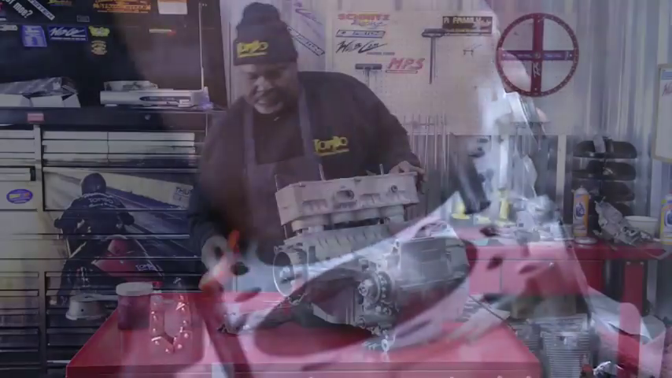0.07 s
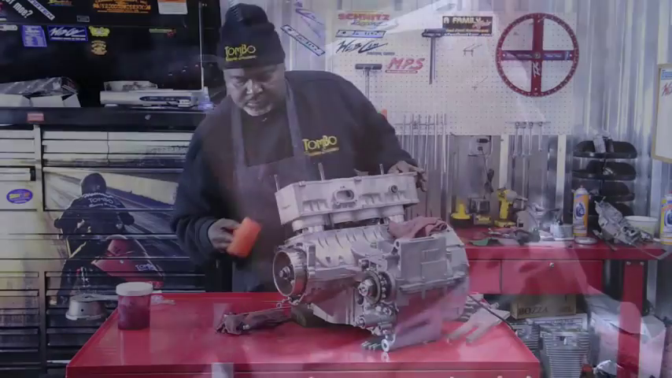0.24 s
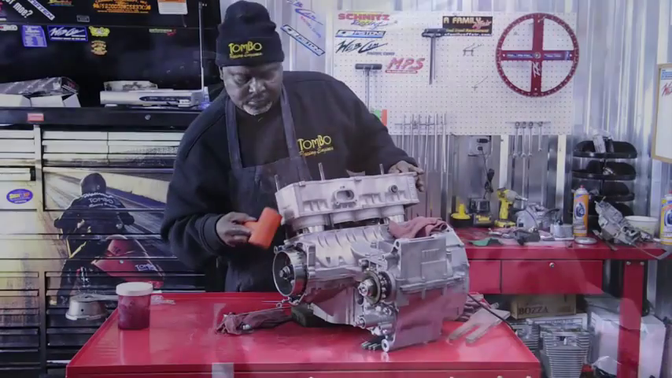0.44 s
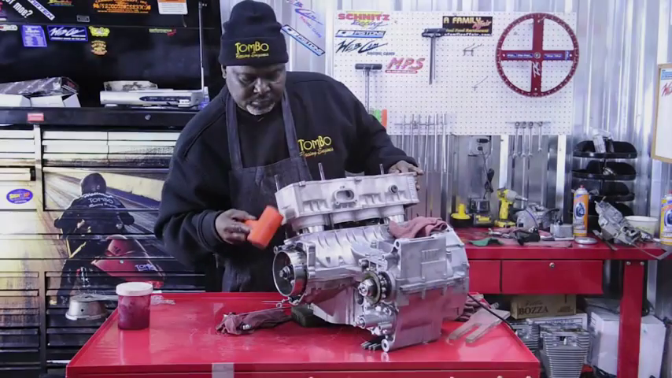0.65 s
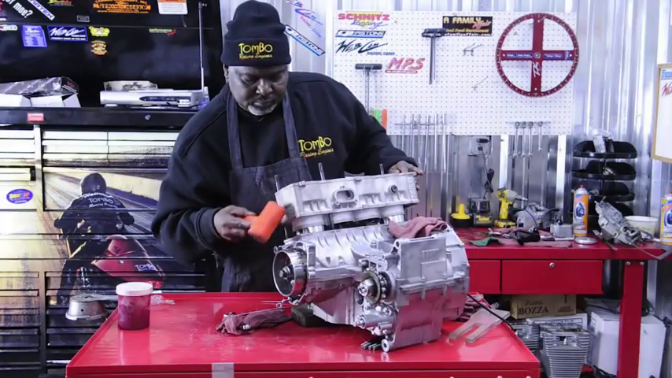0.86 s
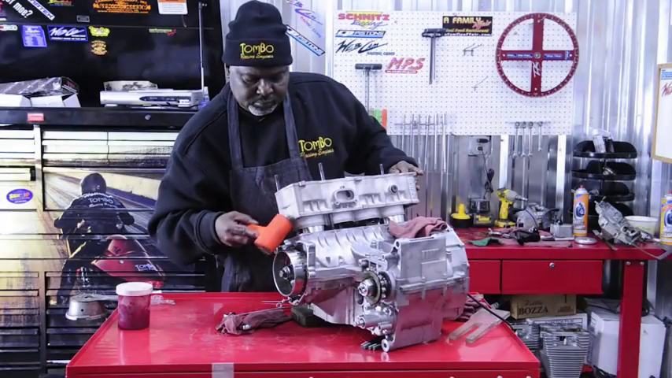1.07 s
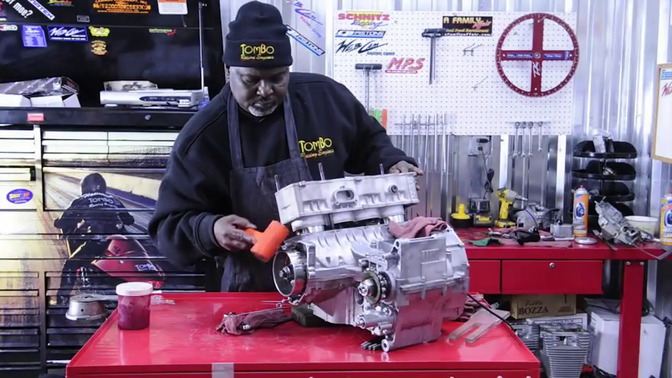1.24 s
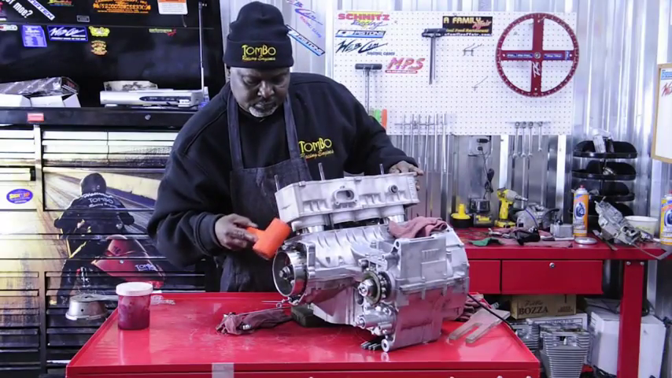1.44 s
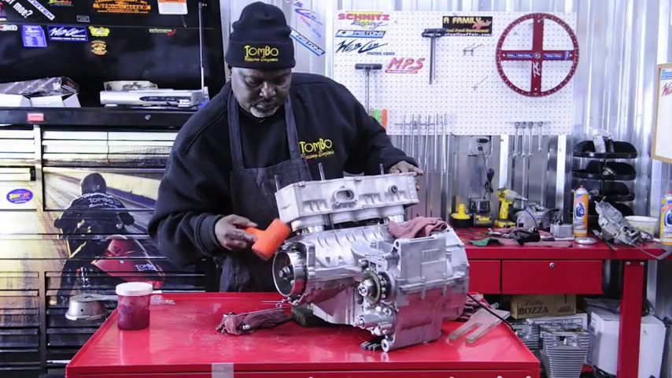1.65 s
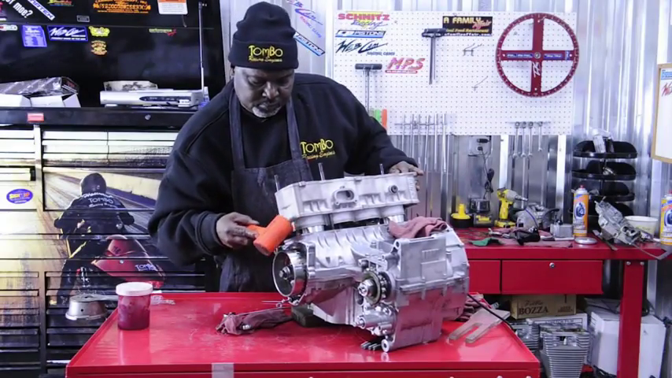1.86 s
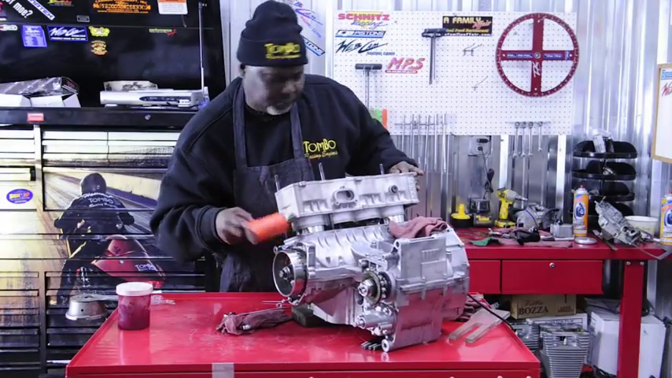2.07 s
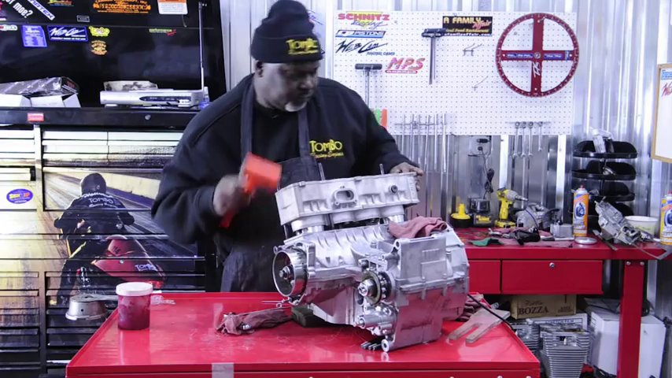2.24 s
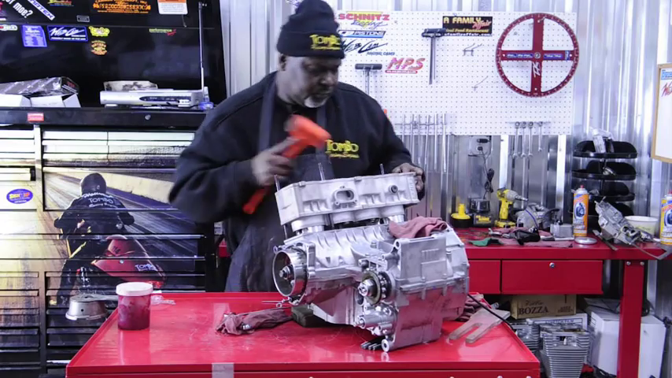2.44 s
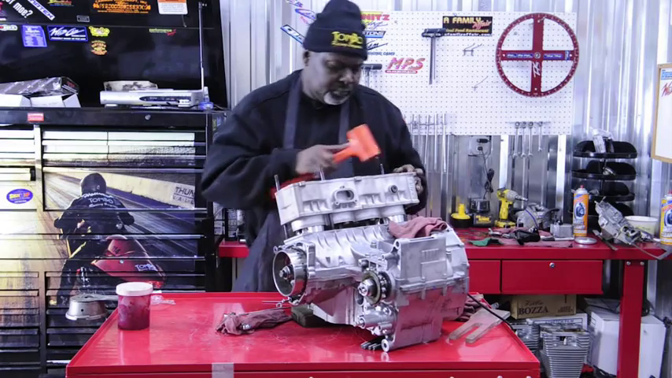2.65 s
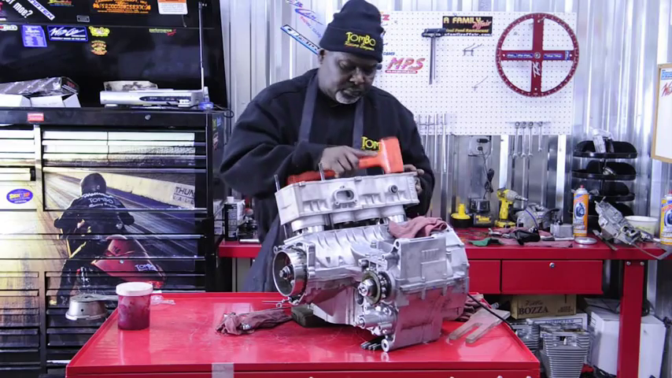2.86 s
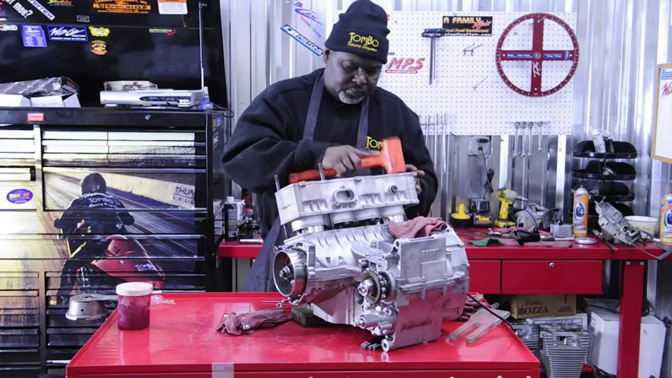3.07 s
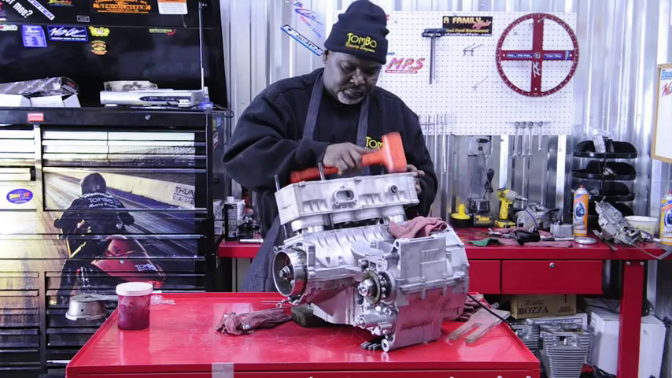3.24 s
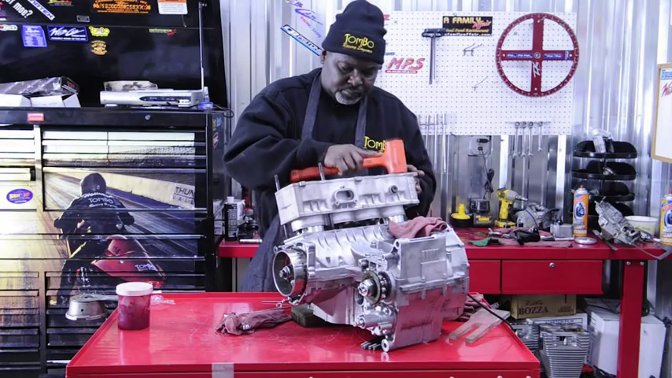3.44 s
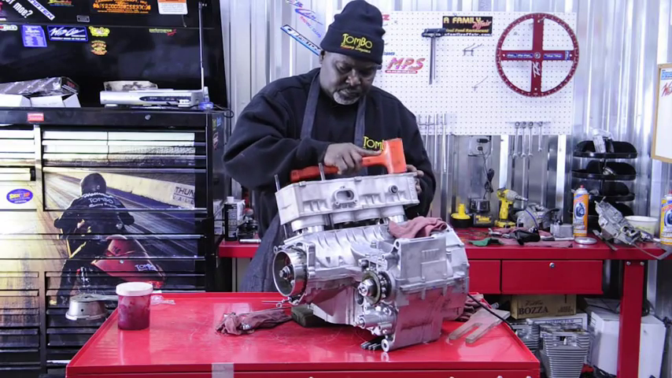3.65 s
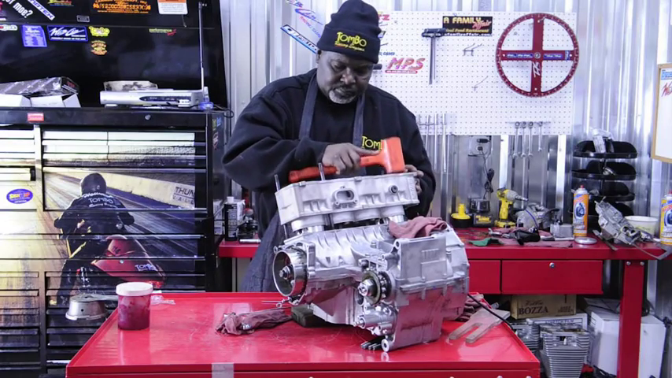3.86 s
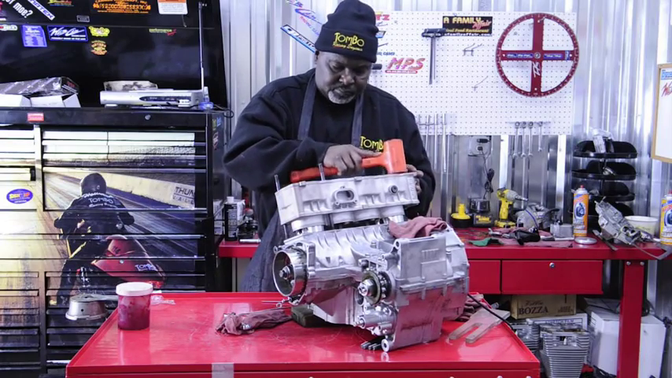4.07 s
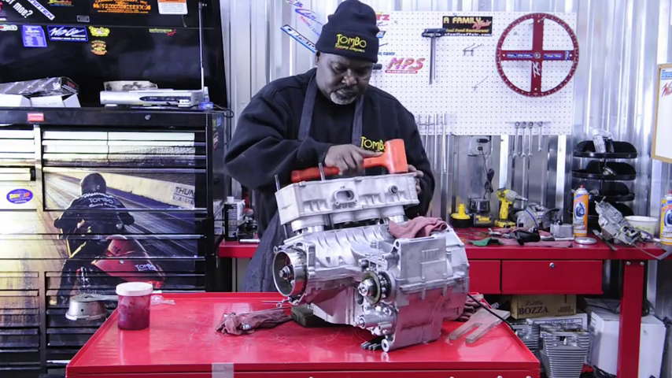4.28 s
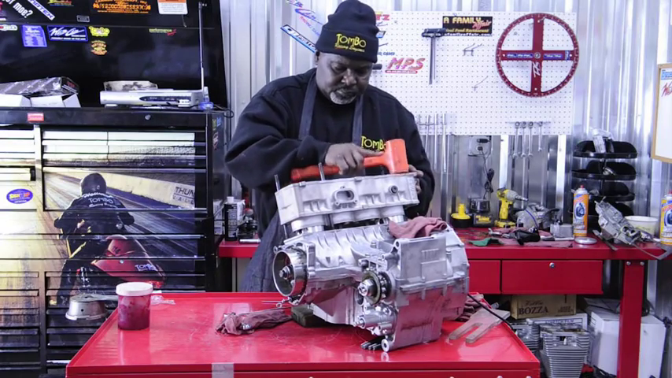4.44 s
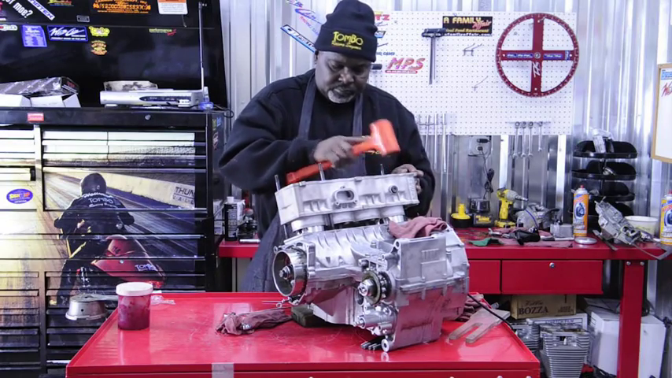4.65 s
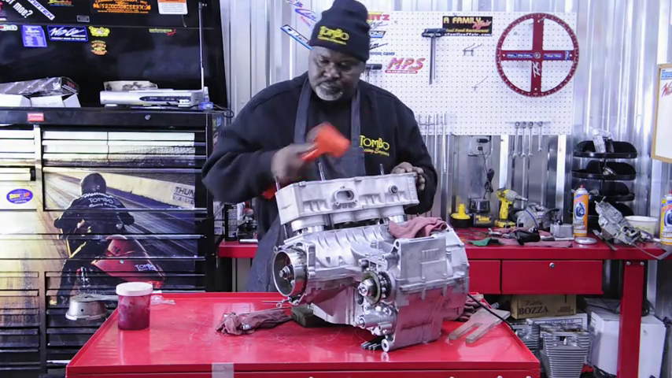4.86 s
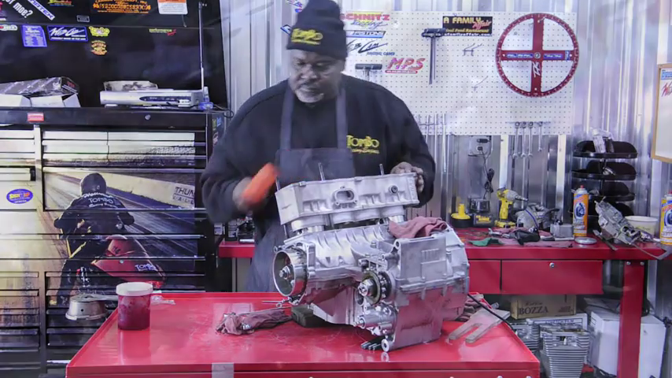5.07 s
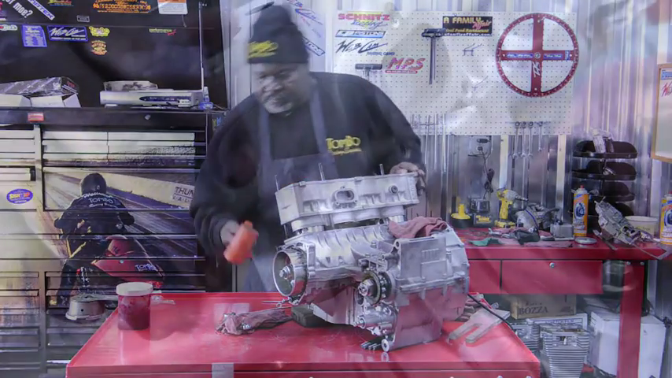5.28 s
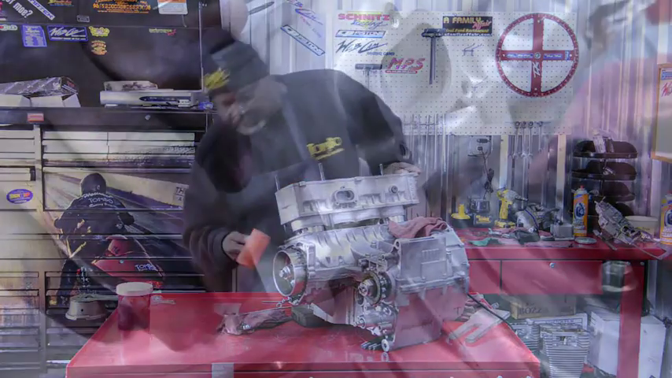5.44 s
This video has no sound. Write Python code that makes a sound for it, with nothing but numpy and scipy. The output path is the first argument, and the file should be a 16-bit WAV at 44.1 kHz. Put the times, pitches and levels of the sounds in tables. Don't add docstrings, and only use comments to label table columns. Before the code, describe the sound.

A low workshop rumble runs throughout, swelling around 1.5 and 3 seconds, with the hissy tail of an earlier clatter fading at the very start. Up to 1.3 s there are faint scrapes, light metallic touches and dull bumps, clearest near 0.8 s. From 1.4 to 2.0 s the shot-filled mallet taps the fins: short, bright double clacks at 1.37, 1.57, 1.80 and 1.98, strongest at 1.8. A softer tap at 2.3 and tiny pellet rattles near 2.5 follow. Loud hollow knocks on top of the block come at 2.94, 3.14, 3.33 and 3.51, each around 600 to 1000 Hz with a late shot rattle and bench thud. Sharp rattly clacks land at 3.67 and 3.87, then three more knocks at 4.13, 4.33 and 4.47, the last loudest. Faint ringing, small touches at 4.7 to 4.8 and a soft rustle finish. Short, diffuse room echo.

```python
import sys
import numpy as np
from scipy import signal
from scipy.fft import rfft, irfft, next_fast_len
from scipy.io import wavfile

SR = 44100
rng = np.random.default_rng(int(sys.argv[2]) if len(sys.argv) > 2 else 0)


def nominal_scale(level):
    x = np.asarray(level, float) / 20
    return 10 ** x


def generate_wav(sig):
    pcm = np.round(np.clip(np.atleast_2d(sig).T, -1, 1) * 32767).astype(np.int16)
    wavfile.write(sys.argv[1], SR, pcm)


N = 242991


def curve(points, hz):
    f, v = np.transpose(points)
    return np.interp(np.log(np.maximum(hz, 1)), np.log(f), v)


def colour(x, points):
    size = next_fast_len(len(x))
    gain = nominal_scale(curve(points, np.fft.rfftfreq(size, 1 / SR)))
    return irfft(rfft(x, size) * gain, size)[:len(x)]


def band(x, lo_hz, hi_hz):
    return signal.sosfilt(signal.butter(2, [lo_hz, hi_hz], "band", fs=SR, output="sos"), x)


def unit(x):
    return x / np.sqrt(np.mean(x ** 2))


def add(out, s, x):
    i = int(s * SR)
    out[i:i + len(x)] += x[:max(len(out) - i, 0)]


def ring(modes, force, length, scatter_db, shift=0.96, crowd=0.):
    t = np.arange(int(length * SR)) / SR
    neighbours = 6 if crowd else 1
    hz, db, t60 = np.repeat(np.transpose(modes)[:, :, None], neighbours, axis=1)
    chance = rng.standard_normal((3,) + hz.shape)
    sign = np.sign(chance[2]) if crowd else 1
    decay = np.exp(-np.log(1000) * t / t60)
    waves = decay * np.sin(2 * np.pi * shift * hz * (1 + crowd * chance[0]) * t)
    response = np.sum(sign * nominal_scale(db + scatter_db * chance[1]) * waves, axis=0)
    y = signal.fftconvolve(force, response)
    return y / np.abs(y).max()


def burst(ms):
    t = 1000 * np.arange(4096) / SR
    return rng.standard_normal(len(t)) * np.exp(-t / ms) * np.minimum(t / (0.27 * ms), 1)


def grains(rate):
    hit = rng.random(N) < rate / SR
    return unit(hit * rng.standard_normal(N) * nominal_scale(1.6 * rng.exponential(size=N)))


def swell(at, length):
    t = np.arange(N) / SR - at
    return np.where(t < 0, np.exp(-(t / (0.98 * length)) ** 2), np.exp(-np.abs(t) / length))


# frequency in Hz, density in dB per Hz.
SHOP_SPECTRUM = [(12, -23.5), (20, -8.5), (32, -6), (53, 1), (105, -0.5), (281, -15.5), (479, -18.5),
                 (521, -22), (913, -25.5), (2970, -37), (4160, -41.5), (13900, -45), (16500, -49)]
# time in seconds, level in dB.
RUMBLE_SWELL = [(0, -0.5), (.4, 0.5), (1.5, 6), (2.15, 1), (3.1, 5.5), (3.8, 0.5), (4.1, 1.5), (4.4, 3),
                (4.7, -0.5), (5.51, 0.5)]


def shop():
    t = np.arange(N) / SR
    rumble_db = np.interp(t, *np.transpose(RUMBLE_SWELL))
    clatter_db = 15.5 * np.exp(-t / 0.21)
    x = nominal_scale(-52.5) * unit(colour(rng.standard_normal(N), SHOP_SPECTRUM))
    low = signal.sosfiltfilt(signal.butter(2, 170, fs=SR, output="sos"), x)
    hiss = x - low
    return low * nominal_scale(rumble_db) + hiss * nominal_scale(0.91 * rumble_db + clatter_db)


# frequency in Hz, level in dB, t60 in seconds.
FIN_MODES = [(1250, -12, .015), (1690, -11, .015), (2100, -9, .015), (2540, -5, .018), (2900, -3, .018),
             (3250, 0, .02), (3700, -5, .015), (4200, -10, .012), (5000, -16, .01), (6000, -21, .008)]


def metal(ms):
    return ring(FIN_MODES, burst(ms), .12, 2, crowd=.06)


# time in seconds, level in dB.
SLIDE_LEVEL = [(0, -57), (.3, -73.5), (.72, -83), (.86, -56), (1.2, -75), (1.64, -63), (2.06, -65.5),
               (2.2, -70.5), (2.4, -59.5), (2.7, -80), (2.9, -72), (3.5, -66.5), (4.1, -69), (4.5, -65),
               (4.85, -71), (5.3, -79.5), (5.51, -63.5)]
# time in seconds, length in seconds, scrape in dB, fizz in dB.
SHOT_SPILLS = [(0.003, .025, -52.5, -61), (0.096, 0.019, -81, -54), (0.182, 0.011, -62.5, -60),
               (0.266, 0.0051, -60, -73), (0.357, 0.033, -50, -64), (0.774, 0.03, -41, -60),
               (1.003, 0.05, -70, -68), (1.307, 0.02, -56, -63), (1.405, 0.011, -68, -53),
               (1.539, .011, -46, -52), (1.762, 0.0076, -51, -56), (1.958, 0.014, -57.5, -64),
               (2.385, 0.039, -52.5, -73), (2.458, .008, -78, -61), (2.516, 0.036, -67.5, -61),
               (2.608, .031, -53.5, -60), (2.687, 0.02, -55, -77), (3.321, 0.0061, -70, -62),
               (3.504, 0.0055, -51, -48.5), (3.685, 0.0077, -67, -42), (3.765, .01, -50, -48.5),
               (3.919, 0.0098, -66, -51), (4.751, 0.013, -77, -55), (5.035, 0.026, -73, -66),
               (5.139, .025, -70, -72), (5.393, 0.11, -71.5, -71)]
# time in seconds, length in seconds, level in dB.
SHOT_RUBS = [(0.013, 0.043, -42.5), (0.12, 0.025, -45), (0.267, 0.011, -53), (0.355, 0.049, -48.5),
             (0.76, 0.013, -48), (1.012, 0.025, -55.5), (1.171, 0.029, -47), (1.395, 0.024, -39.5),
             (2.497, .028, -57), (2.604, 0.056, -54), (2.679, 0.012, -48.5), (3.76, 0.012, -54),
             (4.752, .008, -56), (5.408, 0.1, -57)]


def shot():
    t = np.arange(N) / SR
    scrape = unit(ring(FIN_MODES, grains(5000), .03, 1, crowd=.035)[:N])
    scrape = unit(scrape + 0.53 * unit(band(grains(4900), 800, 5500)))
    fizz = unit(band(grains(6000), 3400, 22000))
    rub = unit(band(grains(3000), 200, 1260))
    scrape_gain = nominal_scale(np.interp(t, *np.transpose(SLIDE_LEVEL)))
    fizz_gain = scrape_gain * nominal_scale(-47.5)
    for s, length, scrape_db, fizz_db in SHOT_SPILLS:
        spill = swell(s, length)
        scrape_gain = scrape_gain + nominal_scale(scrape_db) * spill
        fizz_gain = fizz_gain + nominal_scale(fizz_db) * spill
    rub_gain = sum(nominal_scale(db) * swell(s, length) for s, length, db in SHOT_RUBS)
    return scrape_gain * scrape + fizz_gain * fizz + rub_gain * rub


# frequency in Hz, t60 in seconds, level in dB.
ECHO_BANDS = [(100, 0.75, -18.5), (328, 0.44, -4), (600, 0.26, -21), (1040, 0.29, -8), (2930, 0.4, -15.5),
              (4930, 0.41, -12), (7990, 0.15, -3.5), (12000, 0.15, -5.5)]


def walls(x):
    t = np.arange(SR) / SR
    echo = np.array(ECHO_BANDS)
    tail = np.zeros(SR)
    for hz in 70. * 2 ** np.arange(0, 8, .5):
        t60, db = curve(echo[:, :2], hz), curve(echo[:, ::2], hz)
        decay = np.exp(-np.log(1000) * t / t60)
        tail += nominal_scale(db) * band(rng.standard_normal(SR), hz / 1.2, hz * 1.2) * decay
    tail = tail * np.clip((t - .008) / 0.0009, 0, 1) / 30
    return signal.fftconvolve(x, tail)[:N]


# frequency in Hz, level in dB, t60 in seconds.
BENCH_MODES = [(127.4, -14, .15), (169.5, -7, 0.36), (190.8, -10.5, 0.24), (213, -2.5, 0.14),
               (261, -13, 0.31), (287, -3.5, 0.13), (358, -5.5, 0.062), (390.4, 0, 0.05),
               (457.3, -1.5, 0.053)]


def thud(ms):
    push = np.diff(np.hanning(int(ms * SR / 1000)))
    force = np.convolve(push, np.append(10, burst(5)[:900]))
    y = ring(BENCH_MODES, force, 1., 1.5, crowd=.06)
    damping = np.exp(-np.arange(len(y)) / SR / .02)
    return y * (nominal_scale(-9) + damping)


def contact(rows):
    out = np.zeros(N)
    for s, fin_db, bench_db, body_db, body_hz, tick_db in rows:
        add(out, s, nominal_scale(fin_db - 3.0) * metal(8.6))
        add(out, s, nominal_scale(bench_db + 4.5) * thud(2.77))
        add(out, s, nominal_scale(body_db + 22.5) * band(burst(3.86), 0.59 * body_hz, 1.305 * body_hz))
        add(out, s, nominal_scale(tick_db - 7.5) * band(burst(6.2), 4500, 11400))
    return out


# time in seconds, fin ring peak in dB, tick in dB.
FIN_TOUCHES = [(0.314, -41, -43.5), (0.354, -37, -74), (0.5555, -41, -73), (0.7014, -46, -65),
               (.7524, -46, -70), (0.8343, -34, -47), (1.1352, -39, -46), (1.1817, -48, -50),
               (1.4049, -32, -52), (1.561, -35, -43), (2.076, -46.5, -73), (3.8651, -24.5, -28),
               (3.8916, -35, -45), (3.9276, -45, -39), (4.7142, -53.5, -44.5), (4.7781, -45.5, -38.5),
               (4.7918, -67, -55), (4.815, -51, -44.5), (5.334, -47, -57.5), (5.4962, -33, -46)]
# time in seconds, bench in dB, body in dB, body tone in Hz.
DULL_BUMPS = [(0.6811, -39.5, -37.5, 840), (0.8243, -34.5, -34, 500), (0.8339, -36, -34, 600),
              (1.1336, -48, -40.5, 600), (1.144, -45, -66, 700), (1.1589, -40, -52, 680),
              (1.1807, -43, -55, 693), (1.5597, -36, -36, 420), (1.577, -50, -31, 400),
              (2.438, -51, -52, 740), (2.484, -64, -58, 786), (3.6755, -52, -29.5, 1400),
              (3.686, -61, -30.5, 1400), (3.8731, -62, -24.5, 1900), (3.881, -50, -33.5, 1790),
              (1.986, -69, -51, 5700), (4.7778, -42, -46.5, 870), (4.814, -58, -54.5, 1137),
              (5.2084, -56, -73, 750)]
# time in seconds, fin ring peak in dB, bench in dB, shot lag in ms,
# shot in dB against the ring.
FIN_TAPS = [(1.3679, -37.5, -34.5, 10.5, 16.5), (1.5745, -21, -31, 4.9, 5.5), (1.8001, -17.5, -34, 6.6, 0),
            (1.9838, -27, -41.5, 7.3, -0.5), (2.3261, -37, -46, 9.3, 8.5), (2.674, -45, -62.5, 4.7, 1),
            (3.6739, -35.5, -35, 10, 10), (3.8737, -24, -38, 8.5, 7)]


def clacks():
    off, face_hz = -120, 864
    rows = []
    for s, db, tick_db in FIN_TOUCHES:
        rows.append((s, db, db - 16.5, db - 19.5, 801, tick_db))
    for s, bench_db, body_db, hz in DULL_BUMPS:
        rows.append((s, off, bench_db, body_db, hz, off))
    for s, db, bench_db, lag_ms, up_db in FIN_TAPS:
        shot_db = db + up_db
        rows.append((s, db, bench_db, db - 14.5, face_hz, db - 2))
        rows.append((s + lag_ms / 1000, shot_db, bench_db - 1.5, off, face_hz, shot_db - 40))
    return contact(rows)


# time in seconds, frequency in Hz, level in dB.
PART_RINGS = [(.829, 110, -39), (1.136, 122, -31), (1.285, 84, -39), (1.375, 122, -27.5),
              (1.587, 3200, -51), (1.801, 112, -31.5), (1.814, 1990, -63), (1.811, 2550, -51),
              (1.812, 3290, -49), (1.991, 2550, -49), (2.338, 130, -37.5), (2.94, 4260, -46),
              (3.149, 4260, -47.5), (3.333, 2550, -48), (3.335, 5250, -74.5), (3.52, 2600, -60),
              (3.691, 3165, -42), (3.889, 3320, -37), (3.892, 3380, -52), (4.141, 4100, -50),
              (4.485, 2700, -47), (4.33, 77, -39), (4.476, 78.3, -41), (3.68, 77.5, -43)]
# time in seconds, frequency in Hz, level in dB.
SHORT_KNOCKS = [(0.681, 987, -38), (.745, 900, -40), (.765, 2320, -32.5), (2.437, 790, -36.5),
                (2.485, 850, -42), (3.6756, 678, -22.5), (3.8643, 636, -19), (5.21, 480, -52.5)]
# time in seconds, peak in dB.
PELLET_TICKS = [(1.1024, -43), (1.1348, -50), (2.4833, -48), (2.4947, -50), (2.5054, -43), (2.5213, -39),
                (2.5314, -45), (3.676, -21), (3.686, -31.5), (3.7944, -52), (3.9281, -35), (4.032, -58),
                (4.113, -50.5), (3.974, -44), (4.0168, -60), (4.048, -54.5), (4.09, -48), (4.8531, -55)]


def rings():
    out = np.zeros(N)
    liner_t60, leg_t60, frame_t60 = 0.33, 0.12, 0.85
    for s, hz, db in PART_RINGS:
        t60 = liner_t60 if hz > 1000 else leg_t60 if hz > 100 else frame_t60
        push = np.hanning(int(SR / hz / 2) + 2)
        add(out, s, nominal_scale(db) * ring([(hz, 0, t60)], push, 1., 2, crowd=.025))
    for s, hz, db in SHORT_KNOCKS:
        add(out, s, nominal_scale(db) * ring([(hz, 0, 0.045)], burst(1.6), .1, 0.1))
    for s, db in PELLET_TICKS:
        add(out, s, nominal_scale(db - 3.5) * band(burst(0.6), 5000, 16400))
    return out


# frequency in Hz, level in dB, t60 in seconds.
HOLLOW_MODES = [(646.4, -6.5, 0.087), (729, -3, 0.089), (554, -10.5, 0.039), (977, -34.5, 0.11),
                (1034, 19.5, 0.022), (1250, -5.5, 0.049), (1460, -21, 0.054), (1810, -17, .04),
                (1926, -5.5, 0.047)]
# frequency in Hz, level in dB, t60 in seconds.
FRAME_MODES = [(48, 16.5, 0.34), (76.7, 16, 2.5), (123, -25, 0.2)]
# time in seconds, knock peak in dB, knock tone in Hz,
# shot in dB against the knock, bench in dB.
TOP_KNOCKS = [(2.937, -14, 589, -11.5, -18.5), (3.144, -12, 595, -13.5, -18), (3.327, -8, 609, -14.5, -17),
              (3.510, -8.5, 606, -14.5, -19.5), (4.127, -9.5, 587, -20, -17.5),
              (4.326, -7.5, 587, -18, -20.5), (4.473, -4.5, 605, -16, -21)]


def knocks():
    out = np.zeros(N)
    t = np.arange(600) / SR
    upper_modes = [(1078, 23.5, 0.029), (1025, -9, 0.043), (1210, -8.5, 0.03)]  # Hz, dB, t60 s
    for s, db, hz, shot_db, bench_db in TOP_KNOCKS:
        s = s - .002
        late = s + 0.0066
        shot_db = db + shot_db
        head = t ** 2 * np.exp(-t / .0016) * np.sin(2 * np.pi * hz * t)
        add(out, s, nominal_scale(db + 1.0) * ring(HOLLOW_MODES, head, 0.16, 0.89, hz / 620))
        add(out, s, nominal_scale(db - 1) * band(burst(8.86), 695, 1880))
        add(out, s + 0.002072, nominal_scale(db - 6.5) * ring(upper_modes, np.hanning(30), .1, 0.65))
        add(out, s, nominal_scale(bench_db) * thud(1.5))
        add(out, s, nominal_scale(db - 32) * ring(FRAME_MODES, np.hanning(200), 1.2, 1.2))
        add(out, s, nominal_scale(shot_db - 29.0) * metal(1.5))
        add(out, late, nominal_scale(shot_db - 3) * metal(14.2))
        add(out, s, nominal_scale(shot_db - 16) * band(burst(4.4), 4300, 14000))
        add(out, late, nominal_scale(shot_db - 17.5) * band(burst(14.0), 2900, 15500))
    return out


# frequency in Hz, side minus mid in dB.
STEREO_WIDTH = [(60, -26.5), (110, -42.5), (200, -40), (380, -42.5), (700, -31), (1290, -35), (2380, -30.5),
                (4400, -19), (8120, -15), (15000, -15.5)]


def scene():
    work = shot() + clacks() + rings() + knocks()
    mid = work + walls(work) + shop()
    side = colour(nominal_scale(-27) * work + nominal_scale(2.0) * walls(work) + nominal_scale(12.5) * shop(), STEREO_WIDTH)
    return np.array([mid + side, mid - side])


def band_limit(x):
    return signal.sosfilt(signal.butter(12, 16790, fs=SR, output="sos"), x)


def record(dry):
    mix = 1.693 * np.tanh(dry / 1.323)
    return band_limit(mix)


dry = scene()
out = record(dry)
generate_wav(out)
```